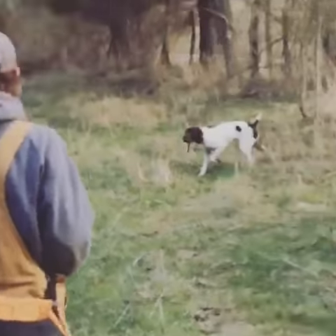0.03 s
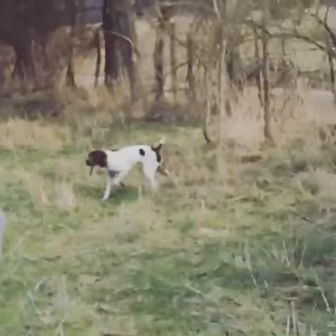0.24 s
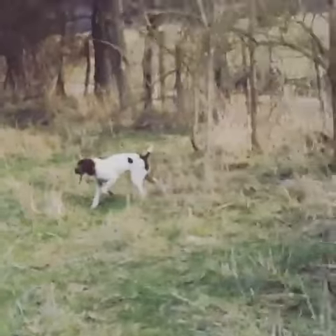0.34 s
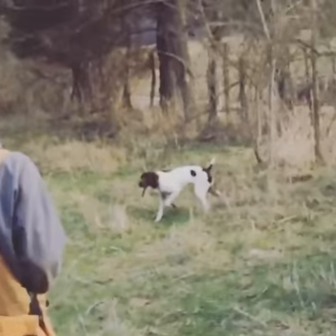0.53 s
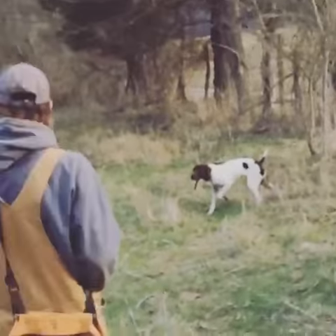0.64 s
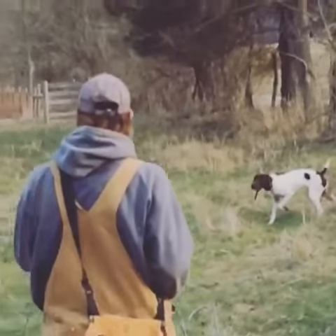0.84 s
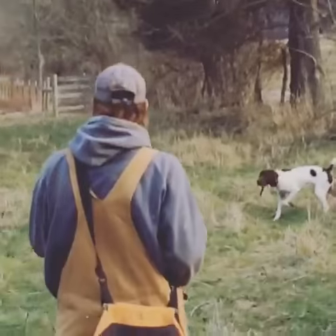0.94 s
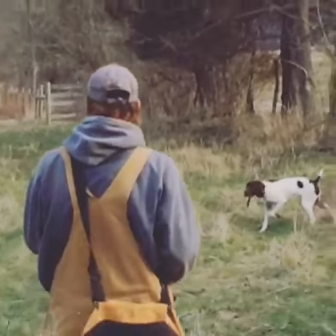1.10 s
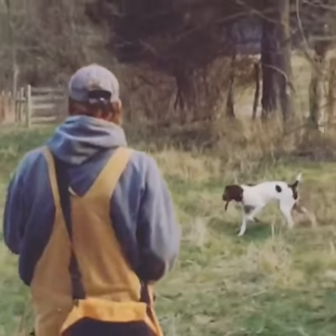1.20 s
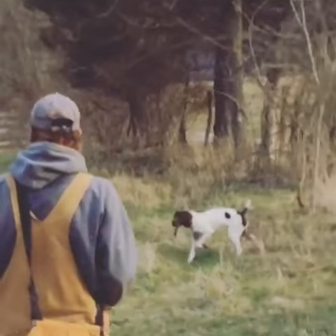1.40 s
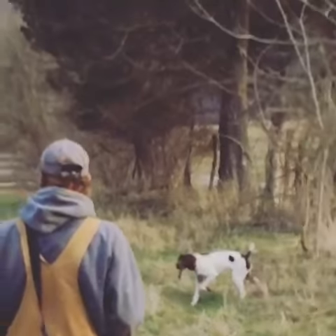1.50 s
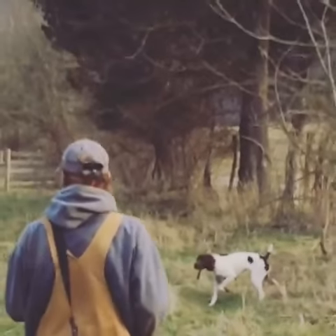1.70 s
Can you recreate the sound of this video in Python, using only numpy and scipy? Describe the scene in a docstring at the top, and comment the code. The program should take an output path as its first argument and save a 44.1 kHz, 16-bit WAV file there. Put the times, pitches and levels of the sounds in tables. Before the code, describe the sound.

Close, quiet steps brush through dry field grass with a light rumble of air. Twigs snap twice in quick succession near the start and crack again later, followed by two dull knocks and a faint low hum.

```python
"""Slow steps through dry grass, close to the microphone. From the start, blades swish against the legs
and crunch under the boots, over a light rumble of air; soles thud and drag. Near 0.25 s a hollow snap
and a sharp crack come in quick succession. A double crack follows just after 1 s, then two dull knocks
near 1.5 s, as of twigs or handled gear. A faint low hum swells at the end."""
import sys
import numpy as np
from scipy import signal
from scipy.fft import rfft, irfft
from scipy.io import wavfile

SR = 44100
rng = np.random.default_rng(int(sys.argv[2]) if len(sys.argv) > 2 else 0)


def transcribe(u):
    """Save the signal u as a 16-bit wav file named by the first command-line argument.

    u: samples, shape (n,) or (channels, n), limited to [-1, 1]; the rate is SR.
    q: integer samples, one column per channel.
    """
    v = np.clip(np.atleast_2d(u).T, -1, 1)
    q = np.round(v * 32767).astype(np.int16)
    wavfile.write(sys.argv[1], SR, q)


N = 77175
T = np.arange(N) / SR
FREQS = np.fft.rfftfreq(N, 1 / SR)


def from_db(db):
    """Amplitude ratio: tenfold for every 20 dB."""
    return 10 ** (np.asarray(db) / 20)


def rms_one(x):
    """Normalisation to unit rms."""
    return x / np.sqrt(np.mean(x ** 2) + 1e-20)


def level(rows):
    """Amplitude envelope interpolated between (time [s], level [dB]) points."""
    return from_db(np.interp(T, *np.transpose(rows)))


def band(x, low_hz, high_hz):
    """Butterworth band-pass filtering."""
    sos = signal.butter(2, [low_hz, min(high_hz, SR / 2 - 500)], "band", fs=SR, output="sos")
    return signal.sosfilt(sos, x + 1e-18)


def coloured(x, colour):
    """Spectral shaping by a smooth curve, rolled off below its first point; unit rms."""
    hz, db = np.transpose(colour)
    f = np.maximum(FREQS, 1)
    gain = from_db(np.interp(np.log(f), np.log(hz), db)) / np.sqrt(1 + (hz[0] / f) ** 4)
    return rms_one(irfft(rfft(x) * gain, N))


def drift(rate_hz):
    """Low-passed noise for slow random modulation; unit rms."""
    return rms_one(irfft(rfft(rng.standard_normal(N)) / (1 + (FREQS / rate_hz) ** 2), N))


def grains(per_s, spread_db, grain_s):
    """Shot noise: tiny decaying bursts of uneven size at random moments; unit rms."""
    onsets = rng.random(N) < per_s / SR
    sizes = onsets * from_db(spread_db * np.minimum(rng.exponential(1, N), 4))
    power = signal.lfilter([1], [1, -np.exp(-1 / (grain_s * SR))], sizes ** 2 + 1e-18)
    return rms_one(np.sqrt(power) * rng.standard_normal(N))


def grass():
    """Friction noise with small ticks: blades swish brightly on the legs and crunch darkly underfoot."""
    # envelopes of brushing and crushing: (time [s], level [dB])
    swish_levels = [(0, -55), (.17, -57.5), (.21, -52), (.28, -52), (.31, -45.5), (.37, -52), (.47, -57.5),
                    (.55, -51), (.61, -58.5), (.65, -46.5), (.745, -46), (.78, -50.5), (.87, -54.5),
                    (.9, -48.5), (1.05, -53), (1.11, -46.5), (1.13, -55), (1.42, -56), (1.49, -62.5),
                    (1.555, -66.5), (1.575, -54.5), (1.61, -61), (1.65, -61.5), (1.75, -54)]
    crunch_levels = [(0, -63), (.17, -62), (.25, -51), (.36, -57), (.42, -57), (.46, -54.5), (.56, -54),
                     (.6, -65), (.67, -54), (.73, -60.5), (.86, -66), (.96, -65.5), (1.1, -68), (1.33, -62),
                     (1.42, -57), (1.47, -61.5), (1.53, -69), (1.63, -72), (1.69, -60.5), (1.75, -67.5)]
    # their spectra: (frequency [Hz], relative spectral density [dB])
    swish_colour = [(200, -14), (700, -14.5), (1500, -12.5), (3000, -4.5), (5000, -1.5), (7500, 1),
                    (11000, -1), (15000, -4)]
    crunch_colour = [(150, -2), (300, -5.5), (550, -1), (800, -2), (1400, 1), (2300, -2.5), (4200, -5.5),
                     (7000, -12), (15000, -42)]
    brushing = rng.standard_normal(N) + from_db(-2.5) * grains(per_s=700, spread_db=3.5, grain_s=0.00036)
    crushing = rng.standard_normal(N) + from_db(0.5) * grains(per_s=450, spread_db=3.0, grain_s=0.00037)
    swish = level(swish_levels) * from_db(1.4 * drift(40)) * coloured(brushing, swish_colour)
    crunch = level(crunch_levels) * from_db(1.7 * drift(23)) * coloured(crushing, crunch_colour)
    return swish + crunch


def air():
    """Pressure fluctuations of air moving over the microphone make an uneven rumble."""
    # rumble spectrum: (frequency [Hz], relative spectral density [dB])
    colour = [(25, -15), (45, -6.5), (70, 0), (110, -0.5), (160, -4), (250, -12), (500, -18.5), (1200, -24),
              (4000, -34)]
    return from_db(-61 + 2.0 * drift(17)) * coloured(rng.standard_normal(N), colour)


def hum():
    """A faint low tone, randomly modulated in frequency and amplitude, swells at the end."""
    # hum envelope: (time [s], level [dB])
    swell = [(0, -66), (1.48, -65), (1.6, -56), (1.7, -48.5), (1.75, -50.5)]
    pitch_hz = 116.8 + 3.2 * drift(13.5)
    tone = np.sin(2 * np.pi * np.cumsum(pitch_hz) / SR)
    return np.sqrt(2) * level(swell) * from_db(1.3 * drift(19)) * tone


def tear(envelope):
    """Tearing as a broadband transient: a whitened noise burst with the energy of its envelope."""
    spectrum = rfft(rng.standard_normal(N) * envelope)
    burst = irfft(spectrum / (np.abs(spectrum) + 1e-12), N) * envelope ** .25
    return burst * np.linalg.norm(envelope) / np.linalg.norm(burst)


def cracks():
    """Brittle fracture: fibres tear in milliseconds, giving a broad resonance, splinters and body."""
    # dry cracks: (time [s], level [dB], frequency [Hz], Q [-], decay [s], relative splinter level [dB])
    fractures = [(0.0282, -47, 5020, 1.9, .001, -9), (.076, -48.5, 4000, 3, 0.0011, -11),
                 (0.2336, -28, 4940, 1.2, 0.001, -7.5), (0.2918, -14.5, 5860, 1.95, 0.0013, -5),
                 (0.2928, -18.5, 3360, 1.24, 0.0012, -11.5), (0.2998, -34, 5300, 0.58, .0012, 0),
                 (0.32, -38.5, 6300, 2.9, 0.0012, -4), (.473, -39.5, 4370, 3, 0.00088, -13),
                 (.669, -40.5, 1520, 2, 0.0026, -4), (.685, -39, 5960, 2.3, .001, -6),
                 (.741, -42, 10000, 1.3, 0.0023, -1), (1.0574, -32.5, 7540, 0.91, 0.00083, 2),
                 (1.0602, -24.5, 6650, 0.76, .0015, -0.5), (1.407, -41, 1610, 1.4, 0.001, -10),
                 (1.115, -41.5, 9000, 1, 0.0011, -7), (1.4647, -35.5, 3210, 3.5, 0.0011, -5.5),
                 (1.5617, -40.5, 2170, 1.2, 0.0019, 7), (1.661, -50.5, 7050, 0.75, .003, 4.5),
                 (1.6835, -47, 3050, 0.25, .003, 7), (1.699, -47, 8000, 1.4, 0.0042, -4),
                 (1.738, -46, 9000, 1, 0.0037, 0)]
    attack_s, body_db = 0.00052, -12.5
    out = np.zeros(N)
    for s, db, hz, q, decay_s, splinter_db in fractures:
        age = np.maximum(T - s, 0)
        envelope = np.minimum(age / attack_s, 1) * np.exp(-np.clip((age - attack_s) / decay_s, 0, 20))
        excitation, fibres = tear(envelope), tear(envelope)
        edge = 1 + .5 / q
        low_hz, high_hz = hz / edge, hz * edge
        resonance = band(excitation, low_hz, high_hz) * np.sqrt(SR / 2 / (high_hz - low_hz))
        splinters = from_db(splinter_db) * band(fibres, 1900, 17000)
        body = from_db(body_db) * band(fibres, 200, 2700)
        out += from_db(db) * (resonance + splinters + body)
    return out


def bumps(rows):
    """Heavily damped oscillation: each soft contact swells and dies within a few cycles."""
    out = np.zeros(N)
    for s, db, hz, rise_s in rows:
        age = np.maximum(T - s, 0)
        rise = np.minimum(age / rise_s, 20)
        out += from_db(db) * rise * np.exp(1 - rise) * np.sin(2 * np.pi * hz * age)
    return out


def thuds():
    """Weight meets the ground in slow impacts, so the energy lies at low frequencies."""
    # footfalls: (time [s], level [dB], frequency [Hz], rise time [s])
    footfalls = [(.115, -58, 110, .006), (.232, -47, 60, 0.0065), (.293, -42, 110, 0.004),
                 (1.272, -43.5, 90, 0.0071), (1.459, -39, 65, 0.0051), (1.69, -53, 65, 0.022)]
    return bumps(footfalls)


def scuffs():
    """Sliding friction of soles and cloth: gritty band noise under a Gaussian envelope."""
    # drags: (peak time [s], level [dB], centre frequency [Hz], half-length [s])
    drags = [(0.223, -59.5, 217, 0.1), (0.358, -60.5, 210, 0.043), (0.398, -61, 1800, 0.031),
             (0.487, -58.5, 440, .03), (0.811, -59, 2200, 0.021), (0.548, -52, 4130, 0.036),
             (0.657, -50.5, 3920, 0.029), (0.962, -66.5, 300, .03), (1.208, -62.5, 546, 0.014),
             (1.41, -60, 277, 0.042), (1.42, -57, 1690, 0.017)]
    edge = 1.57  # frequency ratio from band centre to edge
    out = np.zeros(N)
    for s, db, hz, half_s in drags:
        grit = rng.standard_normal(N) + grains(per_s=350, spread_db=3.5, grain_s=.0004)
        envelope = np.exp(-np.minimum(((T - s) / half_s) ** 2, 20))
        out += from_db(db) * envelope * rms_one(band(grit, hz / edge, hz * edge))
    return out


def hollow_snap():
    """Modal ringing: each quick slip of the snap excites the same short-lived resonances."""
    # slips as it gives way: (time [s], level [dB])
    slips = [(0.2343, -14), (0.2361, -21), (0.241, -29.5)]
    # hollow resonances: (frequency [Hz], relative level [dB], time to fall 60 dB [s])
    modes = [(1332, -6.5, 0.023), (1890, -7.5, 0.022), (2340, -11.5, 0.013), (3220, -2.5, 0.022),
             (3760, -9, 0.025), (4060, -9.5, 0.018), (4600, -5.5, 0.021), (4900, -12, 0.017),
             (5600, -11, 0.0046), (6900, -11, 0.01), (10740, -20.5, 0.0093)]
    out = np.zeros(N)
    for s, db in slips:
        age = np.maximum(T - s, 0)
        for k, (hz, mode_db, t60) in enumerate(modes):
            envelope = from_db(db + mode_db - 60 * np.minimum(age / t60, 4))
            out += (-1) ** k * envelope * np.sin(2 * np.pi * hz * age)
    return band(out, 1150, 14600)


def knocks():
    """Brief impacts, dull because damping stops them ringing on."""
    # contacts: (time [s], level [dB], frequency [Hz], rise time [s])
    contacts = [(.2677, -35.5, 1860, 0.0012), (.266, -39, 261, 0.0026), (.273, -41, 1170, 0.0028),
                (.2925, -37.5, 232.5, 0.0027), (.2925, -35.5, 1060, 0.00046), (1.059, -41.5, 413, .001),
                (1.4652, -27, 983, 0.00083), (1.5628, -30, 830, 0.00058)]
    return band(bumps(contacts), 174, 9000)


def scatter(x, gain_db=-16.5, decay_s=0.0092):
    """Diffuse reflection from clothes and ground gives a short, weak tail in the open air."""
    tail = rng.standard_normal(N) * np.exp(-np.minimum(T / decay_s, 20))
    return from_db(gain_db) * signal.fftconvolve(x, tail / np.linalg.norm(tail))[:N]


def scene():
    """Superposition of all sources in one channel; only snap, cracks and knocks are scattered."""
    hits = cracks() + hollow_snap() + knocks()
    return (hits + scatter(hits) + grass() + thuds() + scuffs() + air() + hum())[None]


def record(dry, cutoff_hz=15450):
    """Band limiting: an elliptic low-pass cuts the top treble steeply."""
    return signal.sosfilt(signal.ellip(10, .2, 70, cutoff_hz, fs=SR, output="sos"), dry)


dry = scene()
out = record(dry)
transcribe(out)
```